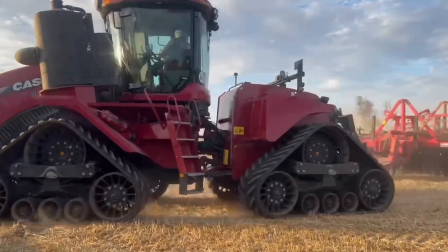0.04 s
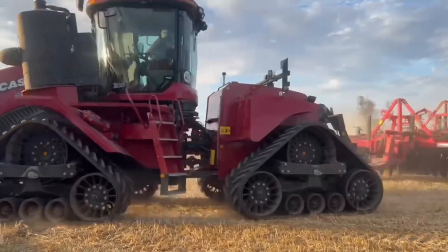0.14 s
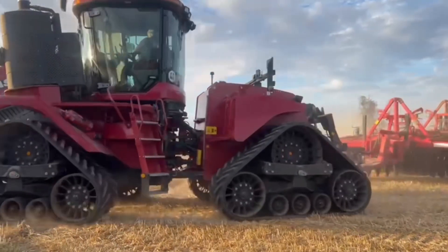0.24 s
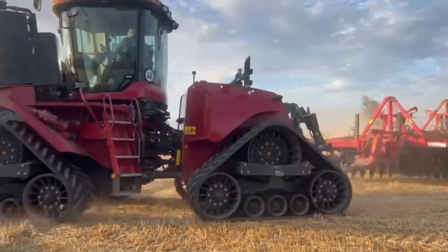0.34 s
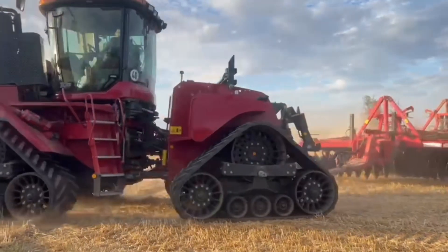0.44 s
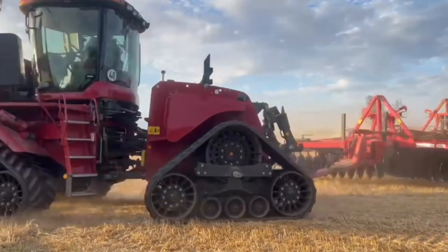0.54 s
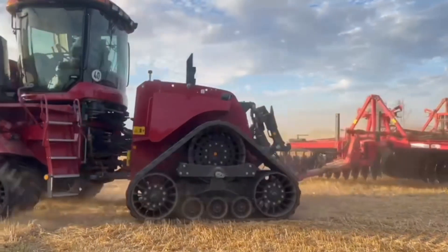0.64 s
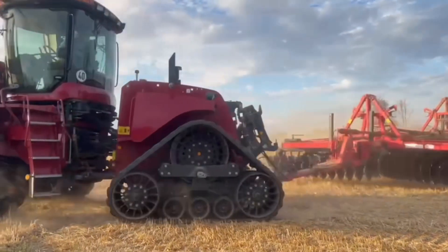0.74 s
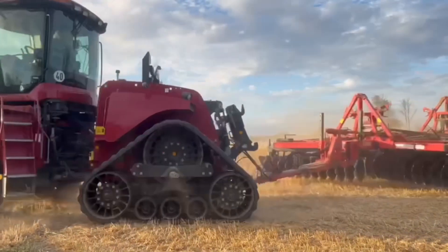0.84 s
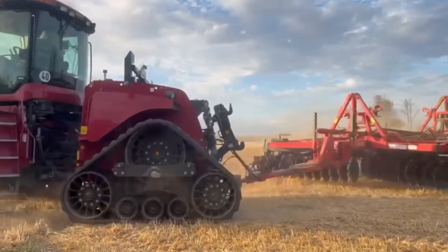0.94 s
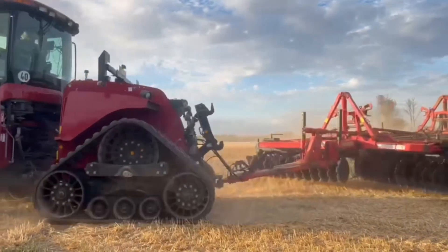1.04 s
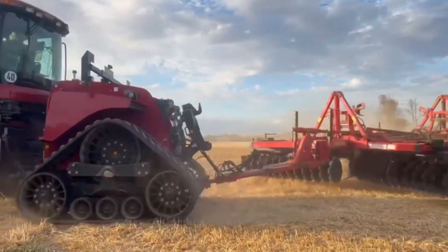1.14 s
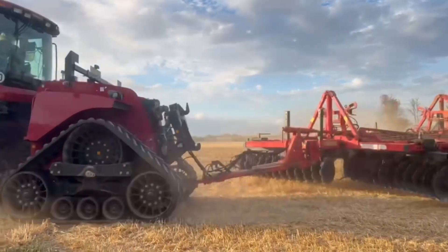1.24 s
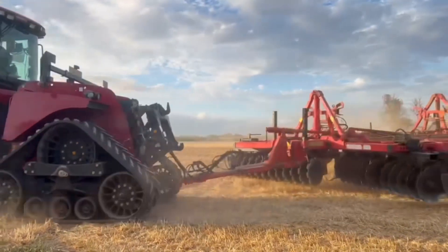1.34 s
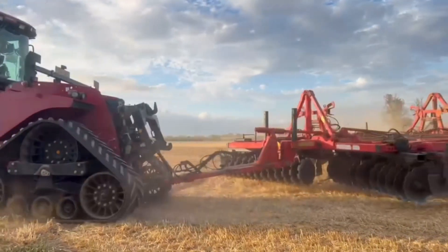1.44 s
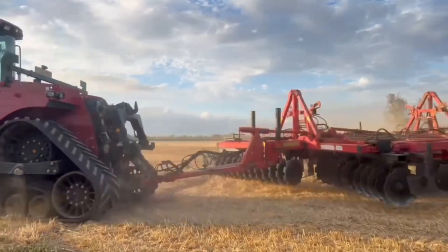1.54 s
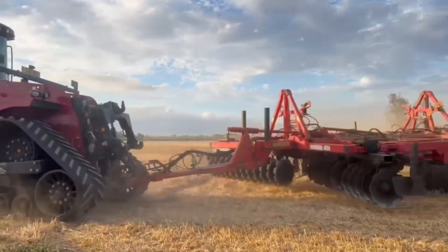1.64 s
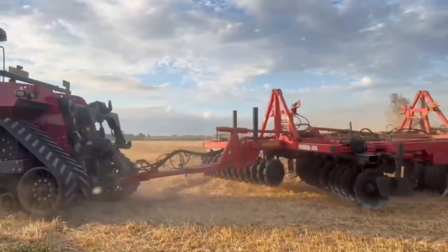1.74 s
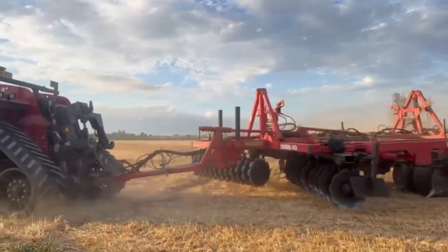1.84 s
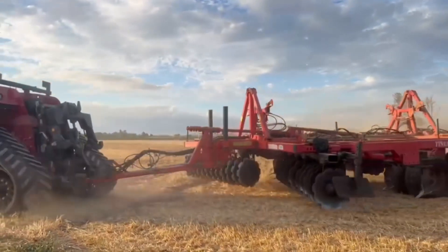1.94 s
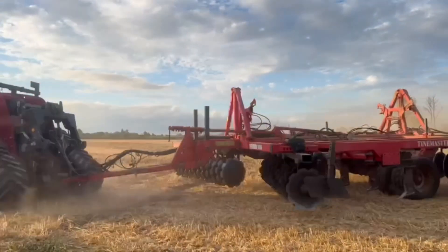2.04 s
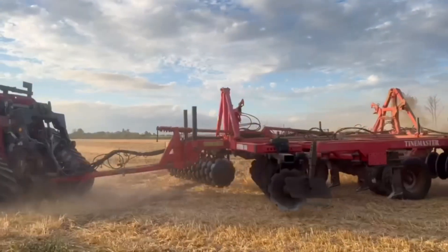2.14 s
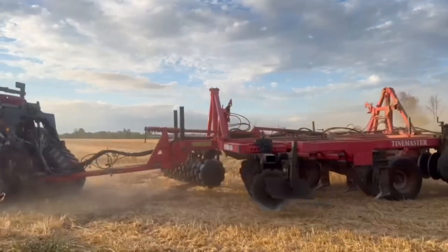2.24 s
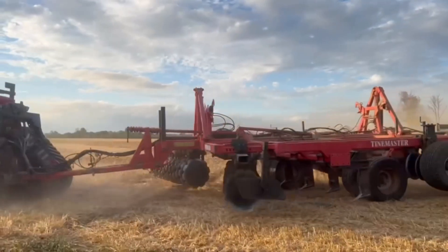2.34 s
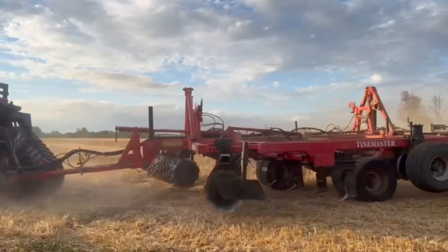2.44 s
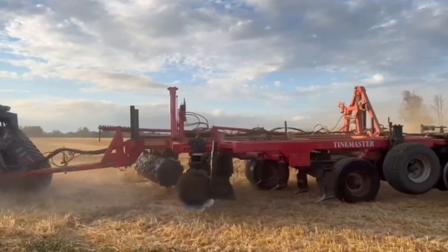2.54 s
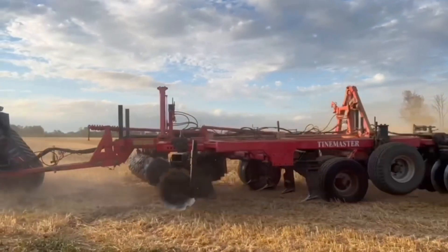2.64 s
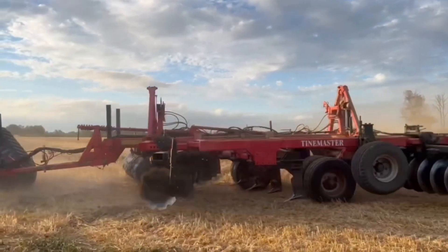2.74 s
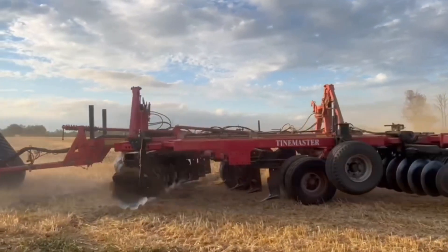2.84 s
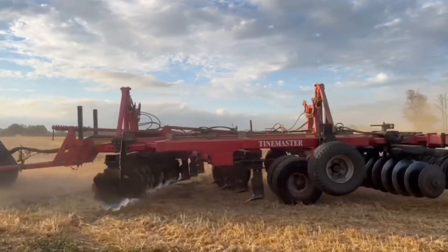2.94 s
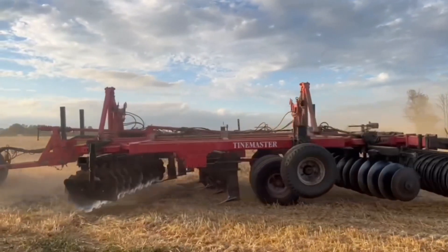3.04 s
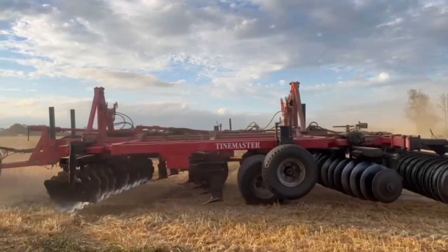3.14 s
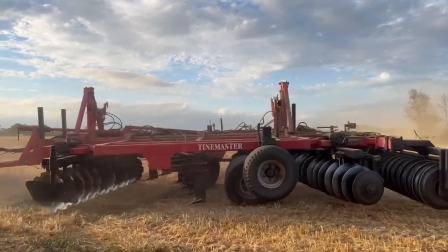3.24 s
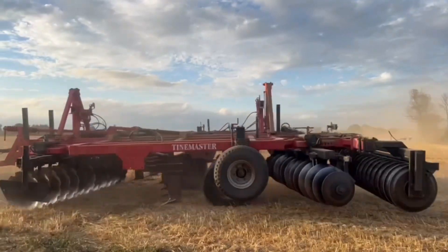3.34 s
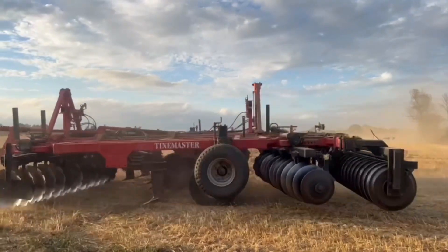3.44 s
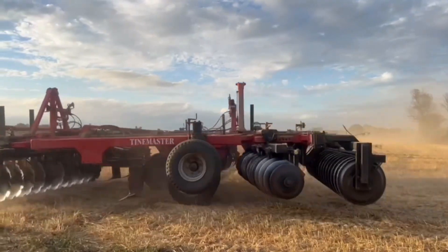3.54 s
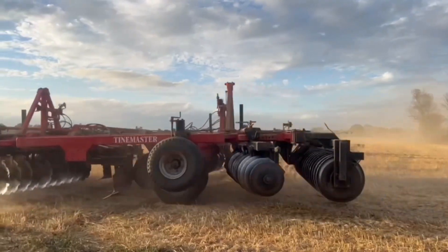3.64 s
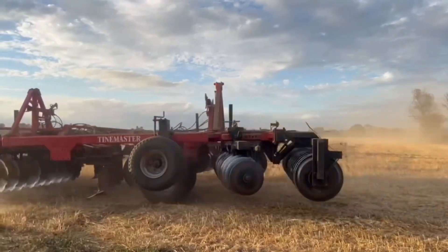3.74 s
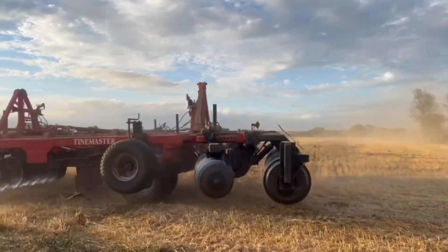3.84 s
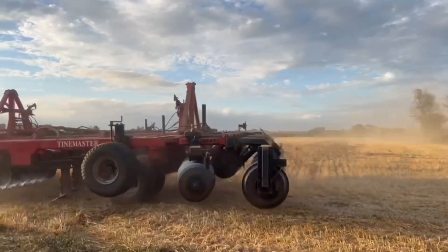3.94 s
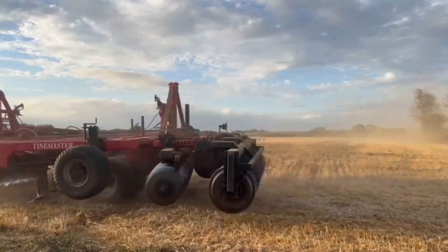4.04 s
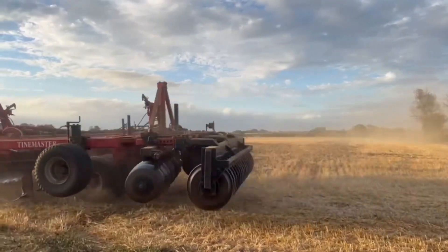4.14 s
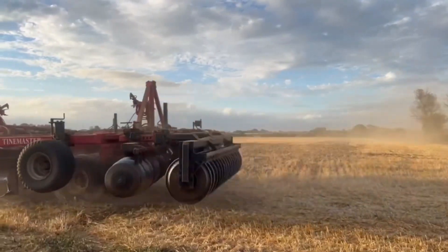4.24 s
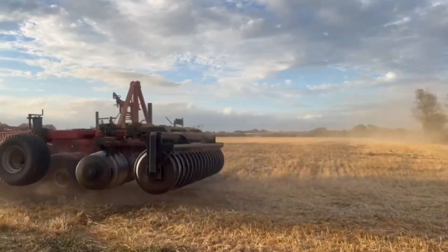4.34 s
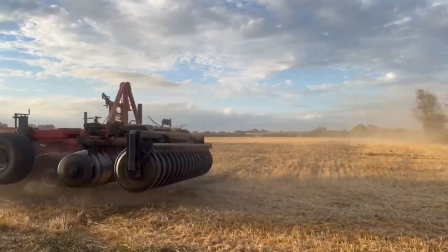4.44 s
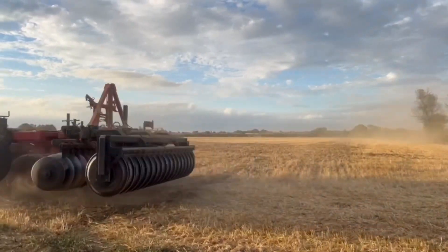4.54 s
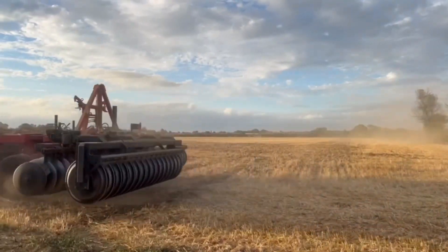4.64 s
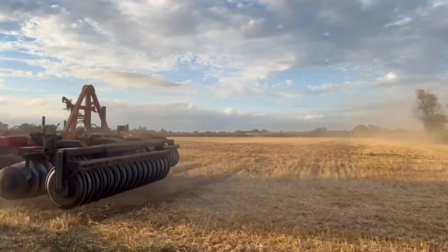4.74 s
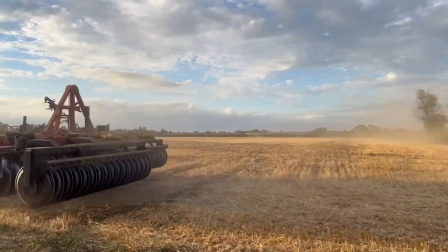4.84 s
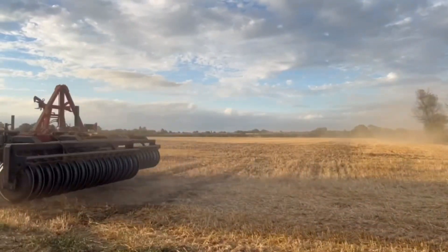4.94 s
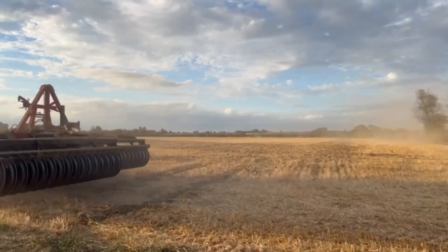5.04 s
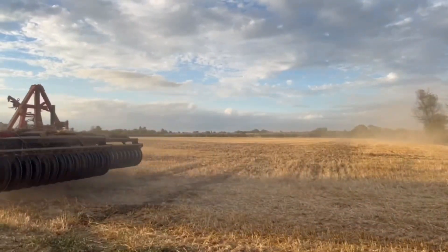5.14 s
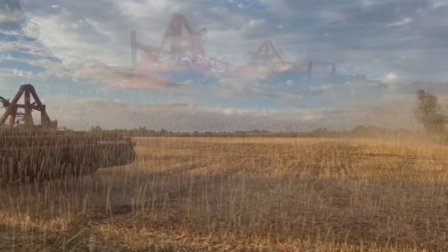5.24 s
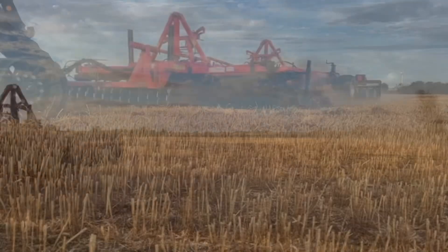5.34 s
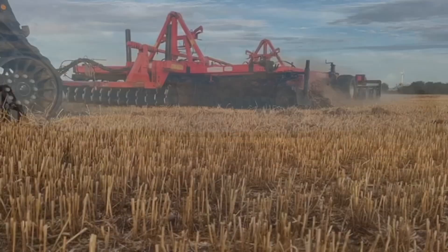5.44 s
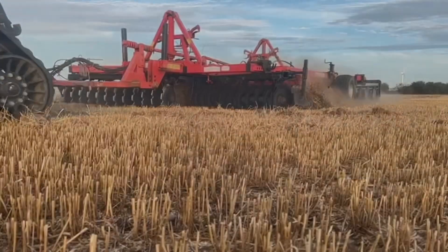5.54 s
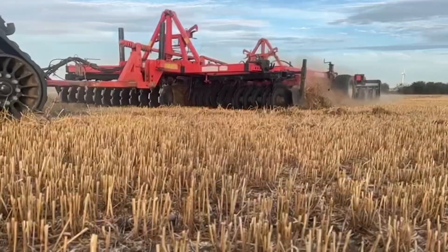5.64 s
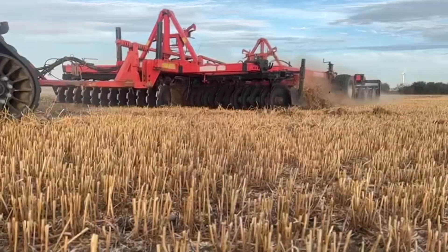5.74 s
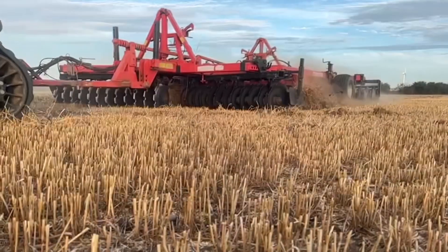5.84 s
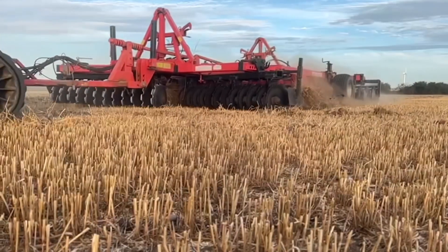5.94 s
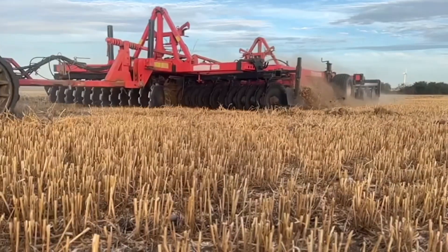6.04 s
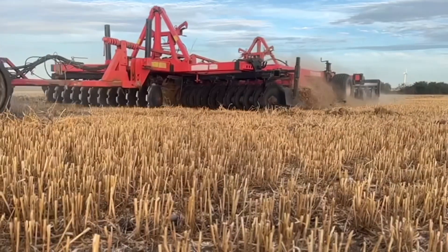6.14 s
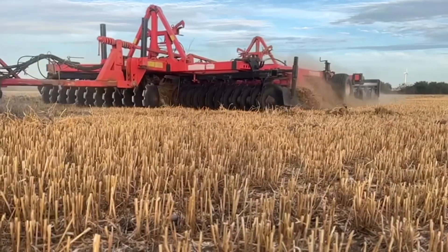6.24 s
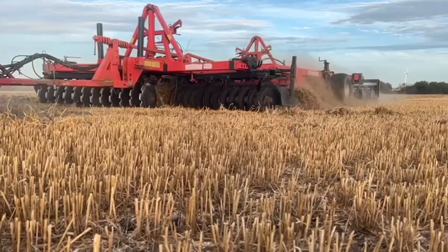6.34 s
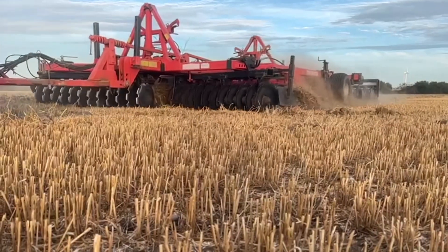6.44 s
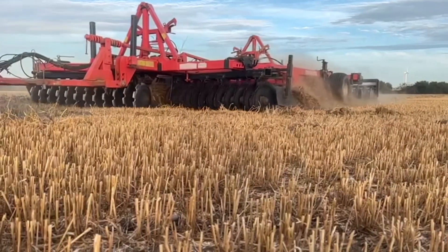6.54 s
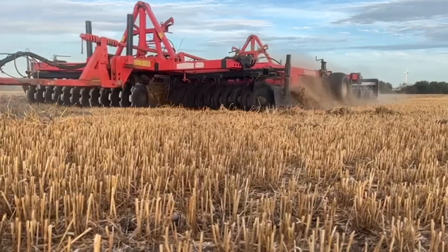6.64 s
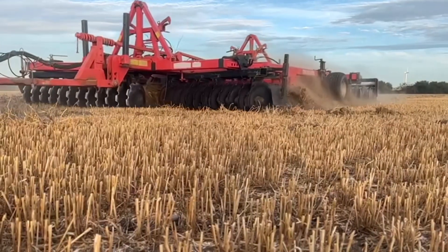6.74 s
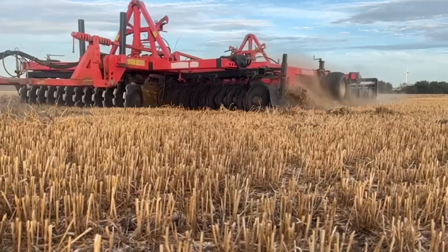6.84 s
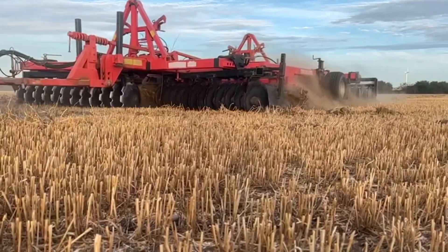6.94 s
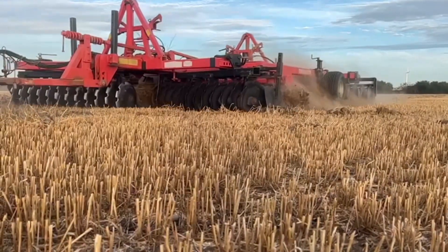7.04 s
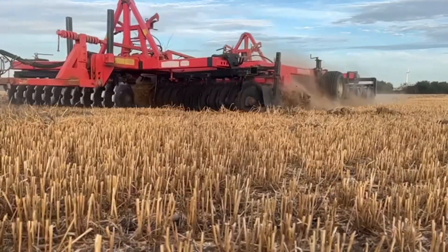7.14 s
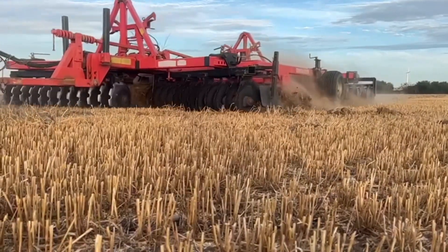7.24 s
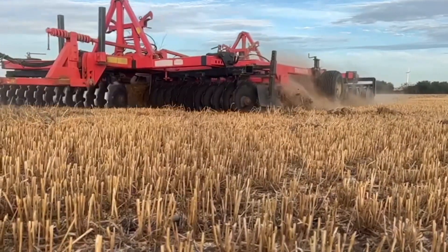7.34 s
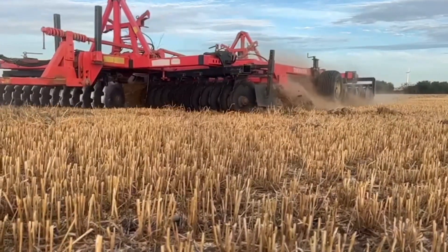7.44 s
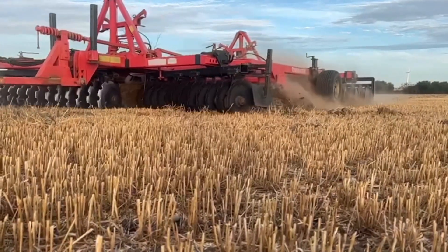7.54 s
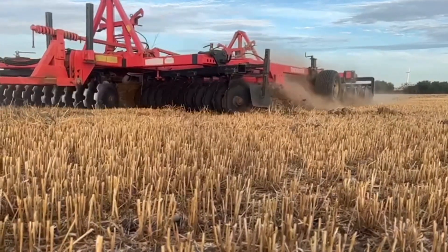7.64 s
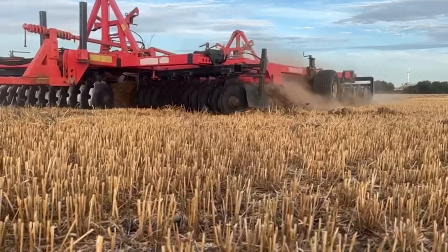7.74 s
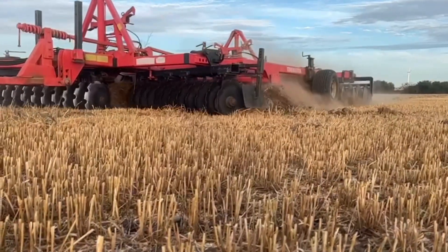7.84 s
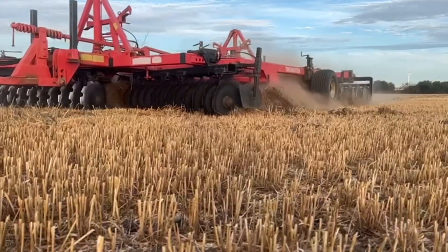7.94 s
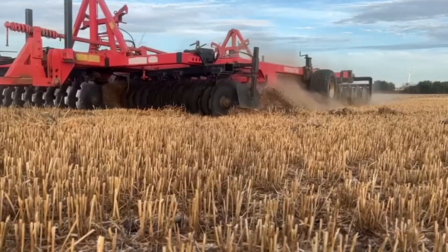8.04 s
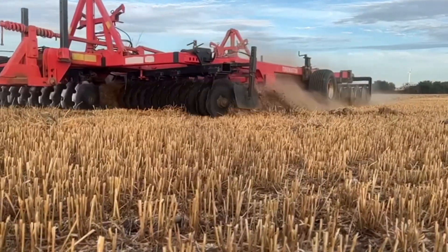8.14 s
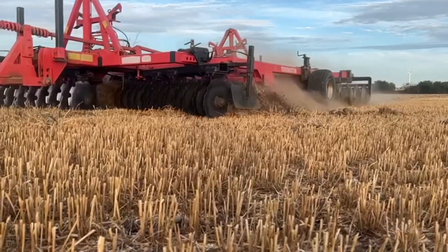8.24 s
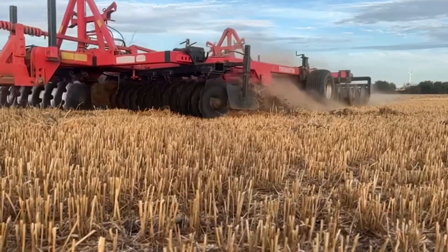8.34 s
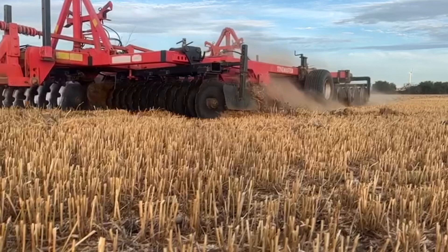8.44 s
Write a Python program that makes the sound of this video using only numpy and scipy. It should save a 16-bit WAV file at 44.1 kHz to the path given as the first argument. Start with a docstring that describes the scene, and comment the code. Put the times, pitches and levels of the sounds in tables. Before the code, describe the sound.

A heavy tracked tractor roars close by and draws away, its disc cultivator clattering through stubble, before the sound drops to a quiet, slowed, throbbing hum.

```python
"""A tracked tractor drags a disc cultivator close past the listener in a stubble field, then draws away.
First: shaped-noise roar, sine engine orders over humming parts, and a noise-band drone that swells early.
Low tone thuds and straw crunches come close by, densest from 4 to 5.3 s; a steel squeak at 4.1 s.
From 5.2 s a second view, slowed, lower and duller, overlaps the first and alone remains after 5.7 s.
It has duller noise, a growing throbbing hum, a low sine note, sparse crunches and late on a disc scrape."""
import sys
import numpy as np
from scipy import signal
from scipy.fft import rfft, irfft
from scipy.io import wavfile
from scipy.ndimage import uniform_filter1d

SR = 44100
rng = np.random.default_rng(int(sys.argv[2]) if len(sys.argv) > 2 else 0)


def persist_wave(psi):
    """Save psi, clipped to +-1, as 16-bit WAV."""
    counts = np.round(np.clip(psi, -1, 1) * 32767).astype(np.int16)
    wavfile.write(sys.argv[1], SR, np.atleast_2d(counts).T)


N = 374850

# Roar spectrum. Each row: frequency in Hz, relative density in dB per Hz.
ROAR = [(22, -29), (60, 1), (120, 8.5), (200, 1.5), (360, 0), (500, -9), (760, -8.5), (1000, -3.5),
        (1150, -17.5), (1350, -23), (1600, -20.5), (1900, -19.5), (2300, -21), (2750, -26.5), (3000, -28.5),
        (5600, -34.5), (6700, -50), (8700, -48.5), (9800, -72.5)]
# Roar spectrum of the slowed view. Each row: frequency in Hz, relative density in dB per Hz.
SLOWED_ROAR = [(22, 0), (60, 8.5), (100, -2.5), (160, -25), (230, -1.5), (300, -24.5), (400, -11),
               (550, -18), (680, -19), (800, -25), (1250, -26.5), (1800, -40), (2500, -43.5), (3100, -56.5),
               (4400, -66.5), (5200, -102.5)]
# Drone that swells while the tracks pass. Each row: time in seconds, pitch in Hz, level in dB.
DRONE = [(0, 180, -45), (.7, 179.3, -28.5), (1.2, 181.7, -26), (1.6, 191.7, -30), (2.2, 193.5, -28),
         (2.6, 189.8, -35), (3.2, 192.6, -40)]
# Low note of the slowed engine. Each row: time in seconds, pitch in Hz, peak in dB.
SLOWED_NOTE = [(5.2, 85, -32), (5.9, 85.3, -36.5), (6.9, 85.5, -39), (7.3, 85.5, -46), (8.5, 85, -44)]
# Hollow parts humming with the roar. Each row: centre in Hz, width in Hz, level in dB re HUM_LAW.
HUMS = [(116.6, 14, -7), (234.5, 24, -7), (625, 190, -5), (1127, 70, -9), (1478, 190, -15),
        (1595, 72, -13.5), (2276, 150, -20.5), (3560, 140, -35)]
# Hollow parts, slowed view. Each row: centre in Hz, width in Hz, level in dB re the slowed hum.
SLOWED_HUMS = [(216, 7, -2), (243, 9, -3), (400, 12, .5), (426, 20, -1.5), (655, 30, -9), (2050, 98, -21)]
# Steel squeak. Each row: starting pitch in Hz, level in dB.
SQUEAK = [(1040, -21.5), (964, -24), (1524, -36)]
# Resonances of a scraping disc. Each row: centre in Hz, width in Hz, relative level in dB.
SCRAPE = [(668, 43, -2), (1020, 40, -7), (1260, 25, -1), (1590, 80, -6), (2040, 45, -17)]
# Scrape envelope. Each row: time in seconds, level in dB.
SCRAPE_LEVEL = [(7.722, -71.5), (7.732, -41), (7.87, -40), (7.97, -45.5), (7.985, -43), (8.11, -53),
                (8.16, -69)]
# Low thuds. Each row: start in seconds, level in dB, pitch in Hz, length in cycles.
THUDS = [(0.173, -11.5, 76, 0.66), (0.78, -11, 83, 1.2), (1.8, -15.5, 72.5, 1.9),
         (2.805, -12.5, 71.2, 1.75), (4.391, -13, 150, 3.7), (4.429, -15, 291, 2.5), (4.579, -17, 110, 0.9),
         (4.692, -19.5, 90, 1.4), (4.783, -15, 250, 2), (4.794, -13, 190, 1.8), (4.816, -16, 260, 2),
         (4.847, -17, 250, 1.6), (5.008, -16, 290, 2), (5.031, -15, 130, 1.2), (5.039, -14, 120, 1.3),
         (5.052, -17, 260, 2), (5.073, -12.5, 178, 2), (5.083, -16, 170, 1.3), (5.189, -20.5, 113.4, 2.5),
         (5.467, -16.5, 73.3, 1.4), (5.473, -14.5, 27, 2.6), (8.163, -16.5, 45.3, 1.4),
         (8.228, -29, 50, 1.1)]
# Crunches of both views. Each row: start in seconds, knock in dB, straw crackle in dB, body in dB,
# steel ring pitch in Hz, ring in dB.
CRUNCHES = [(1.974, -17.5, -39, -25.5, 3465, -47), (2.856, -24, -62, -29, 1516, -38),
            (3.255, -27.5, -44.5, -43.5, 1580, -39), (3.356, -28, -49.5, -32.5, 2260, -58),
            (3.793, -50, -63, -43, 1590, -51), (4.087, -25, -46.5, -36, 1535, -49),
            (4.384, -31.5, -45.5, -30, 3670, -57), (4.466, -32.5, -47, -31.5, 1500, -42.5),
            (4.487, -37, -59, -29.5, 662, -30), (4.571, -38, -48.5, -36.5, 1590, -46),
            (4.594, -43, -53, -35, 2270, -47), (4.631, -38, -62, -49, 806, -30),
            (4.671, -40.5, -46, -40, 1560, -44.5), (4.745, -41, -47, -36.5, 3576, -49),
            (4.779, -23, -42, -24.5, 1886, -31.5), (4.797, -31, -56, -40, 3444, -44),
            (4.82, -37, -54, -31.5, 2174, -43), (4.846, -31.5, -51, -32.5, 3600, -48),
            (4.911, -29.5, -50, -35.5, 1575, -33.5), (4.937, -26.5, -52, -44, 1600, -44),
            (4.986, -32.5, -34, -27, 3550, -35.5), (5.002, -31, -36.5, -32.5, 2370, -38),
            (5.028, -34.5, -55, -36.5, 3440, -43), (5.055, -31.5, -52, -32, 2180, -47.5),
            (5.074, -31, -45, -27, 5280, -45), (5.133, -24.5, -42, -27.5, 2975, -43),
            (5.164, -28.5, -46, -31.5, 3520, -57), (5.222, -34, -57, -43.5, 2230, -43),
            (5.294, -39.5, -46, -37, 3135, -48), (6.117, -44, -55, -53, 1180, -46.5),
            (6.768, -35, -49.5, -55.5, 1190, -54.5), (6.972, -45.5, -50, -59, 1199, -37.5),
            (6.984, -34, -50, -59.5, 419, -29.5), (7.69, -30.5, -50, -57.5, 680, -47),
            (7.731, -48.5, -36, -55.5, 1680, -45.5), (7.85, -44.5, -47, -46.5, 690, -35),
            (7.98, -39, -44, -48.5, 1580, -47), (8.408, -51, -45, -39, 1260, -60)]
# Knock resonances at speed 1. Each row: centre in Hz, width in Hz, relative level in dB.
KNOCK = [(596, 68, -12.5), (1028, 150, -5.5), (1602, 39, -14)]
# Straw crackle spectrum. Each row: frequency in Hz, level in dB.
CRACKLE = [(800, -8.5), (1300, -19.5), (1700, 9), (2300, 7), (3500, -0.5), (5000, -1.5), (7000, -16),
           (9000, -39), (12000, -57)]
# Straw crackle spectrum, slowed view. Each row: frequency in Hz, level in dB.
SLOWED_CRACKLE = [(400, -8.5), (700, 11.5), (1000, 11), (1600, -3), (2000, 0), (2800, -25), (3250, -31),
                  (3600, -21), (3900, -37), (4800, -64.5)]
# Engine speed before hunting. Each row: time in seconds, engine cycles per second.
CYCLE = [(0, 13.97), (1.4, 13.92), (2, 14.0), (2.5, 14.13), (3, 14.16), (3.5, 14.1), (4.2, 14.03),
         (5.6, 14.05)]
# Engine orders. Each row: multiple of the engine cycle, level abeam in dB re ORDER_LAW,
# level once turned away in dB re ORDER_LAW.
ORDERS = [(6, -8, -6), (9, -7, -1), (12, -5, -9), (17, -9, -1), (18, -10, -1), (20, -11, -10), (22, -7, -6),
          (23, -16, -8), (24, -5, 1), (27, -3, -4), (30, -4, -6), (33, -7, -17), (45, -13, -12),
          (59, -20, -7), (90, -11, -30)]
# Two microphone ports, tractor abeam. Each row: frequency in Hz, likeness 0-1,
# lead of the right beyond its delay in radians, left minus right in dB.
ABEAM_PORTS = [(0, .996, 0, 0), (250, .99, .45, 0), (330, .92, .2, 0), (690, .78, .2, 5),
               (790, .65, 1.1, 7), (1000, .97, 2, 1), (1200, .78, 2.2, -4), (1360, .62, 1.6, -2),
               (1650, .6, 2.2, -4), (2000, .35, 1.6, -3), (2300, .45, -.2, 0), (2720, .45, 2.1, 1),
               (3050, .3, .1, 1), (3700, .8, .4, 0), (4300, .1, 0, 9), (5700, .3, -1.9, 12),
               (7100, .65, .5, 1), (7800, .45, 1, 2), (9000, .85, .9, 0)]
# Ports once the tractor has turned away. Each row: same columns and units as ABEAM_PORTS.
AWAY_PORTS = [(0, .996, 0, 0), (250, .998, .46, 0), (330, .9, -.1, -1.5), (690, .9, 0, 4), (790, .7, .5, 9),
              (1000, .95, 1.95, 2), (1200, .75, 2.4, -5), (1360, .9, -.5, -1), (1500, .5, .3, -2),
              (1650, .45, 1, -3), (2000, .68, -.5, -1), (2300, .68, -.9, -.5), (2720, .92, 1.9, 0),
              (3050, .3, 0, 3), (3700, .78, .35, -.5), (4300, .3, -1.2, 10), (5700, .3, -2, 12),
              (7100, .87, .5, 0), (7800, .45, 1, 2), (9000, .85, .9, 0)]
# Ports in the slowed view. Each row: same columns and units as ABEAM_PORTS.
SLOWED_PORTS = [(20, .99, -.2, 1), (45, .95, -.6, 0), (70, .9, -1.8, 0), (110, .76, -1.9, 0),
                (200, .45, -2, 4), (290, .1, 0, 2), (410, .85, .7, -2), (600, .3, 1, 3), (750, .3, 1.8, 5),
                (950, .1, 3.2, 3), (1200, .5, 1.8, 0), (1650, .75, .6, 0), (1950, .5, -3, 0),
                (2250, .1, -3, 8), (2700, .2, -3, -1), (3350, .97, 0, 0), (3800, .6, 1.2, 0),
                (4200, .98, 3.1, 0)]

SLOWED_SPEED, SLOWED_FROM_S, FIRST_ENDS_S = .4, 5.165, 5.667
NEAR_M, SPEED_M_PER_S, ABEAM_S, TURNED_BY_S = 4.64, 4.77, 0.0, 2.16
# Laws: (dB at the nearest point, dB lost per dB of spreading)
ROAR_LAW, HUM_LAW, ORDER_LAW = (-22, 0.99), (-24.5, 1.26), (-25.5, 1.2)
# Tilts of the roar spectrum, before its 200-1300 Hz band is set to rms 1
RUMBLE_LAW, MIDDLE_LAW, HISS_LAW = (-1.9, -0.26), (7.37, 0.52), (-2.45, -0.012)
SWELL_AT_S, SWELL_S, SWELL_DB = 5.33, 0.78, 5.5  # bass swells as the last rollers go by
SLOWED_DB, SLOWED_RUMBLE_DB, RUMBLE_DB_PER_S = -38, -2, -0.57
HUM_DB, HUM_DB_PER_S = -49, 2.5  # level at FIRST_ENDS_S, growth
THROB_PER_S, THROB_AT_S, THROB_DB = 4.426, 6.3, 2.5
SQUEAK_AT_S, SQUEAK_S, SQUEAK_SAG = 4.086, 0.035, .03  # sag: share of pitch lost by the end
# Knock, crackle, body, ring; hold, T60 and strike are at speed 1
RISE_S, HELD_S, T60_S = [[0.0017], [0.012], [0.0054], [0.0036]], 0.0091, [[0.14], [0.22], [0.31], [0.22]]
STRIKE, STRIKE_S = 0.62, 0.0042  # extra knock amplitude at the first instant, its decay
RING_WIDTH_HZ, STRUCK = 210, .55  # width at speed 1, clean-tone share of the ring
RIGHT_LATE_S, EDGE_HZ = .000295, 9300

T = np.arange(N) / SR
HZ = np.fft.rfftfreq(1024, 1 / SR)[:, None]
FRAMES = np.arange(N // 256 + 5) * 256 / SR  # STFT frame times in seconds


def gain_of(db):
    """Amplitude factor of a level in dB."""
    return 10 ** (np.asarray(db) / 20)


def evened(x):
    """Scales to rms 1."""
    return x / np.sqrt(np.mean(x ** 2) + 1e-20)


def steadied(x, size=900):
    """Evens out slow chance swells of a noisy sound, keeping its grain."""
    return x / np.sqrt(abs(uniform_filter1d(x ** 2, size)) + 1e-20)


def read(points, hz):
    """Reads a spectrum table on a log-frequency axis."""
    f, value = np.transpose(points)
    return np.interp(np.log(hz + 1), np.log(f + 1), value)


def curves(rows, at):
    """Interpolates every later column over the first."""
    s, *columns = np.transpose(rows)
    return [np.interp(at, s, c) for c in columns]


def add(mix, s, sound):
    """Adds a sound in place from time s."""
    part = mix[round(s * SR):][:len(sound)]
    part += sound[:len(part)]


def above(hz):
    """Weight rising from 0 at hz to 1 an octave higher."""
    return np.clip(np.log2(HZ / hz + 1e-9), 0, 1)


def law(rule, t):
    """Level in dB following the spreading loss of the leaving tractor."""
    near_db, share = rule
    distance = np.hypot(1, SPEED_M_PER_S * (t - ABEAM_S) / NEAR_M)  # re NEAR_M
    return near_db - share * 20 * np.log10(distance)


def resonate(x, hz, width_hz):
    """Two-pole resonance applied twice, for steep skirts."""
    b, a = signal.iirpeak(hz, hz / width_hz, SR)
    return signal.lfilter(b, a, signal.lfilter(b, a, x))


def banded(db, lo_hz, hi_hz):
    """Shifts each spectrum so that the band lo-hi has rms 1."""
    inside = (HZ > lo_hz) & (HZ < hi_hz)
    return db - 10 * np.log10(np.sum(gain_of(2 * db) * inside, 0) / 1.5)


def scattered(x):
    """Pairs a sound with its scatter off stubble and ground: a short decaying tail of random taps."""
    tail = rng.standard_normal(900) * np.exp(-np.arange(900) / 300.)
    return np.array([x, signal.oaconvolve(x, tail / np.linalg.norm(tail))[:N]])


def ports(pair, table, late_s=0):
    """Left hears the first sound; right a delayed, phase-turned blend of both."""
    f = np.fft.rfftfreq(N, 1 / SR)
    like, lead, balance_db = curves(table, f)
    a, b = rfft(pair)
    blend = like * a + np.sqrt(1 - like ** 2) * b
    right = np.exp(1j * (lead - 2 * np.pi * f * late_s)) * blend
    share = np.sqrt(2 / (1 + gain_of(2 * balance_db)))  # keeps the summed power
    return irfft([share * gain_of(balance_db) * a, share * right], N)


def noise_field(db, patchy_db, flicker_db):
    """Two unrelated noises on one field of levels, with drifting patches and a shared flicker."""
    a, b, c, d, patches = rng.standard_normal((len(FRAMES), len(HZ), 5), dtype=np.float32).T
    patches = uniform_filter1d(patches, size=9, axis=0)  # over frequency
    patches = evened(uniform_filter1d(patches, size=10, axis=1))  # over time
    flicker = evened(uniform_filter1d(rng.standard_normal(len(FRAMES)), size=4))
    level = gain_of(db + patchy_db * patches + flicker_db * flicker)
    z = np.array([a + 1j * b, c + 1j * d]) * level
    return signal.istft(z, nperseg=1024, noverlap=768)[1][:, :N]


def hums(table):
    """Noise ringing in hollow parts: fuzzy tones with bell-shaped spectra."""
    f = np.fft.rfftfreq(N, 1 / SR)
    power = 0
    for hz, width_hz, db in table:
        bell = 1 / (1 + (2 * (f - hz) / width_hz) ** 2)
        power = power + (gain_of(db) * evened(bell)) ** 2
    return irfft(rfft(rng.standard_normal((2, N))) * np.sqrt(power), N)


def drone():
    """Narrow band of noise shifted up to follow its pitch curve."""
    hz, db = curves(DRONE, T)
    r = np.exp(-np.pi * 16. / SR)  # 16 Hz wide low-pass pole, used twice
    a, b = rng.standard_normal((2, 2, N))
    waver = signal.lfilter([1], [1, -r], signal.lfilter([1], [1, -r], a + 1j * b))
    tone = evened((waver * np.exp(2j * np.pi * np.cumsum(hz) / SR)).real)
    return gain_of(db) * tone


def slowed_note():
    """Sine on its pitch and level curve, faded in over 50 ms."""
    hz, db = curves(SLOWED_NOTE, T)
    fade_in = np.clip((T - SLOWED_FROM_S) / .05, 0, 1)
    return gain_of(db) * np.sin(2 * np.pi * np.cumsum(hz) / SR) * fade_in


def squeak():
    """A few sagging tones of steel, held briefly."""
    t, out = np.arange(0, SQUEAK_S, 1 / SR), np.zeros(N)
    bent = t * (1 - SQUEAK_SAG * t / SQUEAK_S / 2)
    tones = sum(gain_of(db) * np.sin(2 * np.pi * hz * bent) for hz, db in SQUEAK)
    add(out, SQUEAK_AT_S, np.sin(np.pi * t / SQUEAK_S) ** 0.47 * tones)
    return scattered(out)


def scrape():
    """One long, gritty stroke of soil friction through the resonances of a disc."""
    grit = rng.standard_normal(N)
    lumps_db = 2.5 * evened(signal.oaconvolve(rng.standard_normal(N), np.hanning(600), "same"))
    sung = sum(gain_of(db) * steadied(resonate(grit, hz, width_hz), size=2500)
               for hz, width_hz, db in SCRAPE)
    level = gain_of(curves(SCRAPE_LEVEL, T)[0])
    return scattered(level * evened(gain_of(lumps_db) * sung))


def thuds():
    """Each thud is a short low tone, under one to a few cycles, in a half-sine window."""
    out = np.zeros(N)
    for s, db, hz, cycles in THUDS:
        turns = np.arange(0, cycles, hz / SR)
        window = np.sin(np.pi * turns / cycles)
        add(out, s, gain_of(db) * window * np.sin(2 * np.pi * turns))
    return out


def crunches(rows, colour, speed):
    """Snapping stalks, clods, struck discs: dull knock, patchy crackle, low body, ring of steel."""
    levels, rings = np.zeros((3, N)), np.zeros(N)
    t = np.arange(SR // 2) / SR * speed  # slowed time
    rise = np.minimum(t / speed / np.array(RISE_S), 1)
    shape = rise * gain_of(-60 * np.maximum(t - HELD_S, 0) / np.array(T60_S))
    shape[0] *= 1 + STRIKE * np.exp(-t / STRIKE_S)

    rattles = rng.standard_normal((len(rows), len(t) + SR // 10))  # extra 0.1 s settles the filter
    for (s, *parts_db, ring_hz, ring_db), rattle in zip(rows, rattles):
        for level, db, fade in zip(levels, parts_db, shape):
            add(level, s, gain_of(db) * fade)
        rattle = steadied(resonate(rattle, ring_hz, RING_WIDTH_HZ * speed))[-len(t):]
        struck = np.sin(2 * np.pi * ring_hz * t / speed)
        ring = STRUCK * struck + (1 - STRUCK) * rattle
        add(rings, s, gain_of(ring_db) * shape[3] * ring)

    grain = round(40 / speed)  # samples
    clumps_db = 3.3 * np.minimum(rng.exponential(1, N // 40 + 1), 4)
    clumps = gain_of(np.repeat(clumps_db, grain)[:N])
    clumps = uniform_filter1d(clumps, size=grain)
    snaps = clumps * rng.standard_normal(N)
    knock = sum(gain_of(db) * steadied(resonate(snaps, hz * speed, width_hz * speed))
                for hz, width_hz, db in KNOCK)
    body = steadied(resonate(snaps, 260 * speed, 260 * speed))
    crackle = steadied(clumps * noise_field(read(colour, HZ), patchy_db=2.2, flicker_db=0))
    dull = levels[0] * knock + levels[2] * body + rings
    return scattered(dull) + levels[1] * crackle


def engine():
    """Sine orders of the slightly hunting engine cycle, each swelling alone, over humming hollow parts."""
    knots = np.arange(0, T[-1] + 1, 1 / 6)
    hunt = .001 * np.interp(T, knots, rng.standard_normal(len(knots)))
    turns = np.cumsum(curves(CYCLE, T)[0] * (1 + hunt)) / SR
    turned = np.clip(T / TURNED_BY_S, 0, 1)
    orders = np.zeros((2, N))
    for k, abeam_db, away_db in ORDERS:
        swell_db = 3.5 * np.interp(T, knots, rng.standard_normal(len(knots)))
        level = gain_of(abeam_db + (away_db - abeam_db) * turned + swell_db)
        orders += level * np.sin(2 * np.pi * (k * turns + rng.random((2, 1))))
    return gain_of(law(ORDER_LAW, T)) * orders + gain_of(law(HUM_LAW, T)) * hums(HUMS)


def roar():
    """Engine, track and disc noise, fading and dulling with distance; its rumble fades more slowly."""
    swell_db = SWELL_DB * np.exp(-((FRAMES - SWELL_AT_S) / SWELL_S) ** 2)
    colour = read(ROAR, HZ)
    colour = colour + law(RUMBLE_LAW, FRAMES) * (1 - above(90))
    colour = colour + law(MIDDLE_LAW, FRAMES) * above(250)
    colour = colour + law(HISS_LAW, FRAMES) * above(1200)
    colour = colour + swell_db * (1 - above(97))
    return noise_field(law(ROAR_LAW, FRAMES) + banded(colour, 200, 1300), patchy_db=2.0, flicker_db=0.1)


def slowed_roar():
    """Duller noise of the slowed view, with sinking rumble."""
    rumble_db = SLOWED_RUMBLE_DB + RUMBLE_DB_PER_S * (FRAMES - FIRST_ENDS_S)
    db = SLOWED_DB + banded(read(SLOWED_ROAR, HZ), 150, 700) + rumble_db * (1 - above(90))
    return noise_field(db, patchy_db=1.5, flicker_db=.4)


def slowed_hum():
    """Hollow-part hum, growing steadily and throbbing in level."""
    throb = np.cos(2 * np.pi * THROB_PER_S * (T - THROB_AT_S))
    level_db = HUM_DB + HUM_DB_PER_S * (T - FIRST_ENDS_S) + THROB_DB * throb
    return gain_of(level_db) * hums(SLOWED_HUMS)


def first_view():
    """Passing tractor; the port response turns from abeam to away."""
    rows = [c for c in CRUNCHES if c[0] < FIRST_ENDS_S]
    pair = roar() + engine() + drone() + squeak() + crunches(rows, CRACKLE, speed=0.94)
    turned = np.clip(T / TURNED_BY_S, 0, 1)
    heard = (1 - turned) * ports(pair, ABEAM_PORTS, RIGHT_LATE_S)
    heard += turned * ports(pair, AWAY_PORTS, RIGHT_LATE_S)
    return heard * np.clip((FIRST_ENDS_S - T) / 0.0053, 0, 1)


def slowed_view():
    """Slowed, lower and duller machine: noise, hum, scrape, and crunches at 0.4 speed."""
    rows = [c for c in CRUNCHES if c[0] > FIRST_ENDS_S]
    pair = slowed_roar() + crunches(rows, SLOWED_CRACKLE, SLOWED_SPEED) + scrape() + slowed_hum()
    return ports(pair, SLOWED_PORTS) * np.clip((T - SLOWED_FROM_S) / .003, 0, 1)


def scene():
    """Both views, plus the slowed note and thuds equal in both channels."""
    return first_view() + slowed_view() + slowed_note() + thuds()


def record(dry):
    """The small microphone loses the lowest bass; then the band limit."""
    thinned = signal.sosfilt(signal.butter(2, 16, "high", fs=SR, output="sos"), dry)
    band_limit = signal.firwin(511, EDGE_HZ, window=("kaiser", 9), fs=SR)
    return signal.oaconvolve(thinned, band_limit[None], "same")


dry = scene()
out = record(dry)
persist_wave(out)
```